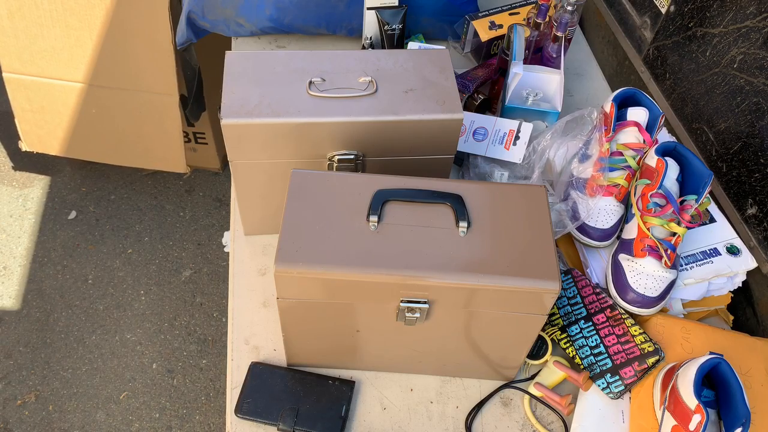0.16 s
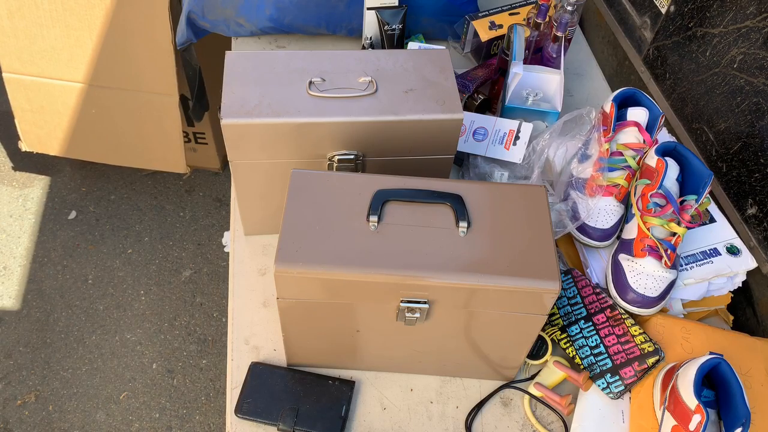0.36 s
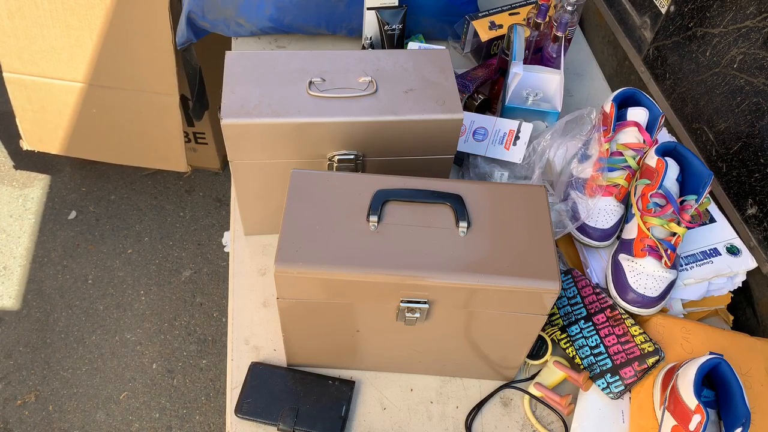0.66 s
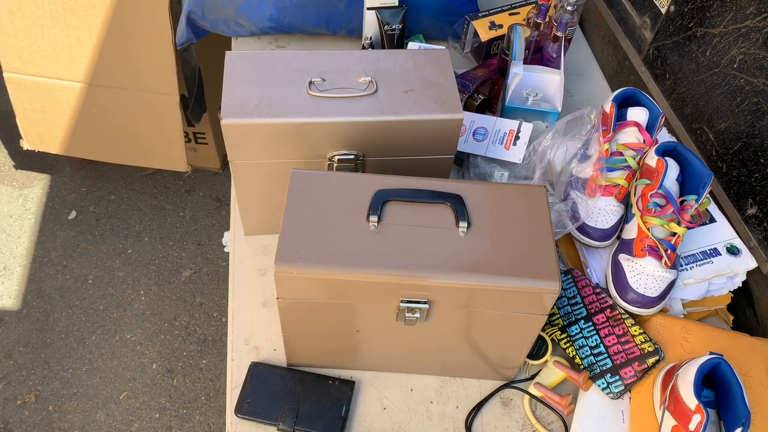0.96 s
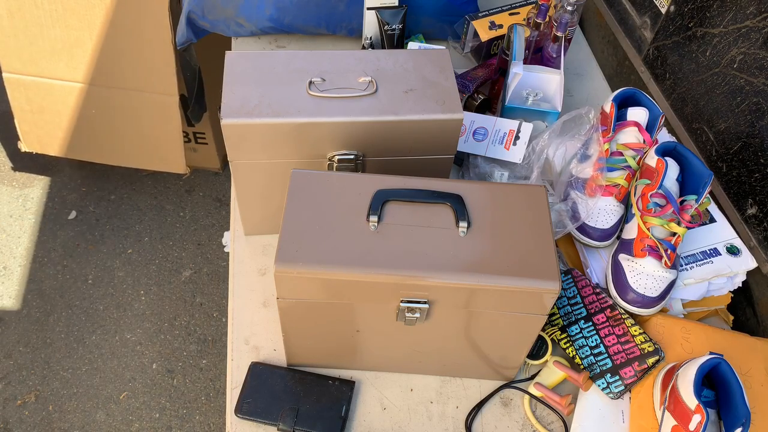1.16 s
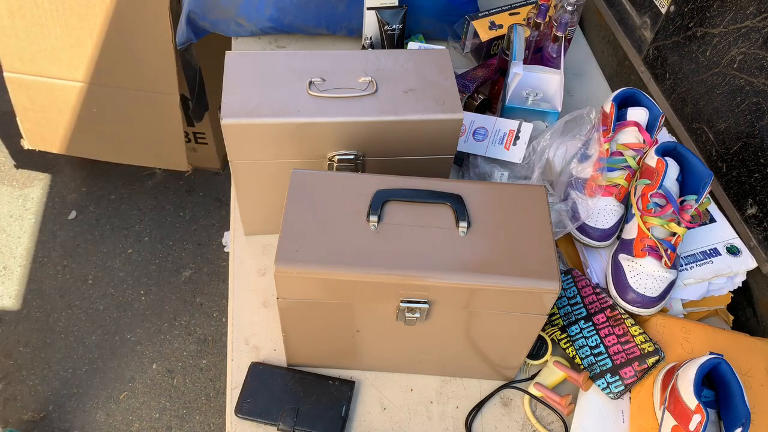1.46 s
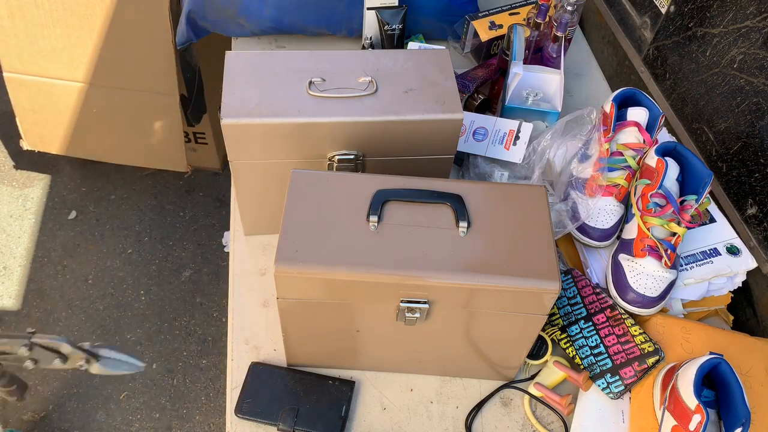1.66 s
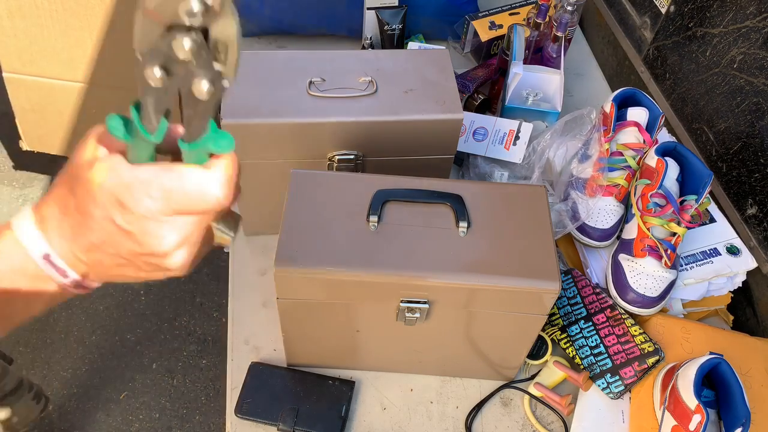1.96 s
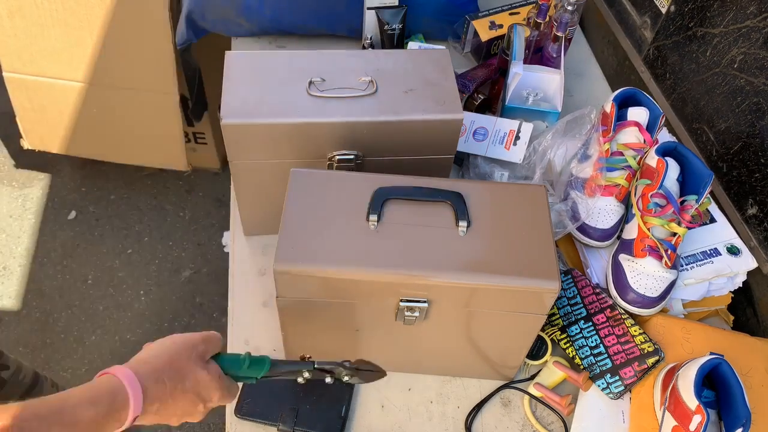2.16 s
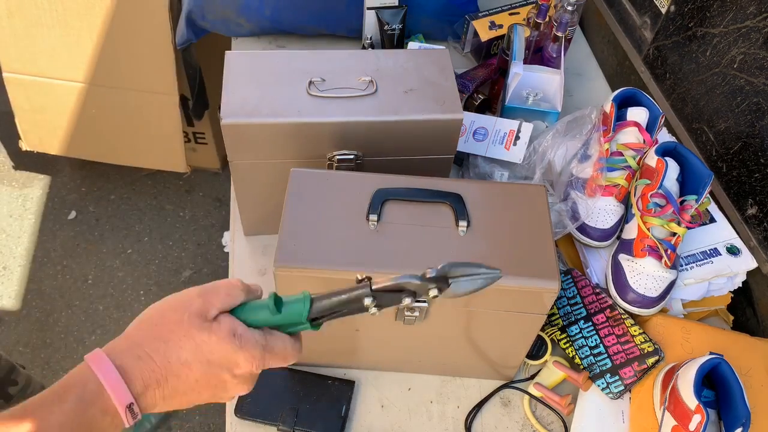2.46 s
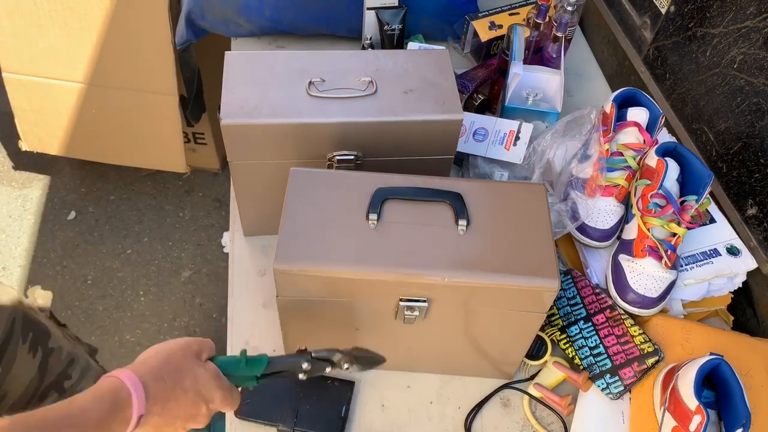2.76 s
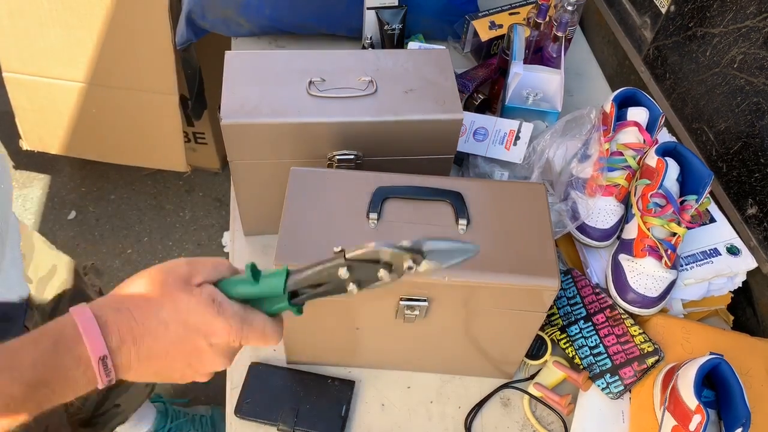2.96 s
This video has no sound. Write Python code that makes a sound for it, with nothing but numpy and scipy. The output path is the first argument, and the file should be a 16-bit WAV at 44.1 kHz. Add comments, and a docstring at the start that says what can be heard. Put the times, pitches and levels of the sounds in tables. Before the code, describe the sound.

Outdoors, quiet wind rumble and shoes scuffing on grit come first, then a loud, rattling metal clank on a thin steel box, a brief pause, and a second shorter clank. Close stereo microphone, faint yard echoes.

```python
"""File box struck twice in a yard

Outdoors in light wind, someone walks up over gritty paving: filtered grains scuff and damped sines knock.
A pair of snips strikes a sheet-steel file box twice, each blow chattering and rebounding.
Clicks ring the panels as decaying sines; noise gathered on dense modes makes the clatter and yard echoes.
Banded noise makes wind rumble on the microphone over distant outdoor noise; slow sines make the puffs.
"""
import sys
import numpy as np
from scipy import signal
from scipy.fft import rfft, irfft
from scipy.io import wavfile
from scipy.ndimage import uniform_filter1d

SR = 44100
rng = np.random.default_rng(int(sys.argv[2]) if len(sys.argv) > 2 else 0)


def to_wav(s):
    """Save 16-bit WAV."""
    ch = np.atleast_2d(s).T  # columns
    pcm = np.round(np.clip(ch, -1, 1) * 32767)  # PCM
    wavfile.write(sys.argv[1], SR, pcm.astype(np.int16))


N = 136710
T = np.arange(N) / SR
SIDES = np.array([[.5], [-.5]])  # shares a left-minus-right dB figure between the channels

# Wind on the microphone, strength over time: time_s, level_db
WIND_LEVEL = [(0.0, -57), (0.17, -44), (0.31, -37), (0.68, -47), (0.95, -44.5), (1.29, -39.5), (1.46, -39),
              (1.67, -46.5), (1.86, -47), (2.06, -49), (2.17, -43), (2.3, -55), (2.41, -53.5), (2.58, -44),
              (2.75, -52), (2.88, -50), (3.1, -62.5)]
# Colour of the wind rumble, relative: frequency_hz, level_db_per_hz
WIND_COLOUR = [(12, -33), (20, 0), (49, 6), (113, -8.5), (182, -19), (200, -40.5), (300, -27.5), (390, -36),
               (660, -120)]
WIND_LUMP_DB, WIND_PATCH_DB = 0.105, 0.8  # unevenness of all bands together, of each band alone

# Distant outdoor noise over time, before AIR_LIFT_DB: time_s, level_db
AIR_LEVEL = [(0.0, -59), (0.94, -56), (1.96, -58.5), (2.24, -49.5), (2.49, -60.5), (2.72, -61.5),
             (2.83, -52.5), (3.1, -61)]
# Colour of the distant noise, relative: frequency_hz, level_db_per_hz
AIR_COLOUR = [(100, 3.5), (150, -3.5), (224, -5.5), (283, -13.5), (471, -15), (700, -18), (1130, -19),
              (3190, -44), (5500, -54.5), (8500, -43.5), (13500, -50), (16000, -52.5)]
# Left-right likeness of wind, distant noise and scuffs: frequency_hz, correlation
AIR_LIKENESS = [(30, 0.94), (100, .96), (500, 0.6), (1500, 0.17), (5000, 0.1), (14000, .3)]
AIR_LIFT_DB, AIR_PATCH_DB = 8.5, 2.3

# Soles scuffing on grit: start_s, rise_s, hold_s, level_db, tilt_db_per_octave, edge_db (extra near EDGE_HZ)
SCUFFS = [(0.16, 0.011, 0.056, -52, 0, -7), (0.174, 0.023, 0.046, -45, 1.8, 1),
          (0.29, 0.0061, 0.025, -58.5, -1.5, -9), (0.343, 0.022, 0.046, -59, -2, 0.1),
          (0.7, 0.015, 0.09, -73.5, 2, 0.1), (0.811, 0.0018, .008, -59, 12, 15),
          (0.83, .002, 0.0067, -49, 0.6, -3), (0.864, 0.0036, 0.016, -64, -3, -8),
          (0.902, 0.0004, 0.0016, -59.5, -9.5, 7), (0.937, 0.0047, 0.066, -62, -6, -6),
          (1.104, .002, 0.0041, -69, -10.5, 7), (1.13, 0.043, 0.13, -76, -8.5, 13),
          (1.307, 0.0023, .004, -60, -5, -7), (1.323, 0.0059, 0.029, -47, -6.5, 3),
          (1.348, 0.0051, 0.011, -46.5, -5.5, 15), (1.358, 0.0016, 0.0098, -42.5, 0, 8),
          (1.378, .002, 0.029, -54, -8, -13), (1.424, 0.0027, 0.0056, -44, -1, 2.5),
          (1.442, .004, 0.026, -72, -8, -3), (1.493, .003, 0.047, -59.5, -5.6, -9),
          (1.812, 0.0022, .003, -78, -10.5, 13), (1.89, 0.0036, .004, -76, 16, 5),
          (1.945, .003, 0.012, -62, -8, -1), (1.984, 0.0014, 0.003, -59, -1, 6),
          (2.006, 0.00088, 0.0081, -46.5, -2.8, -2), (2.583, 0.0033, 0.007, -71, -6, 12)]
# Colour of the grit, relative: frequency_hz, level_db_per_hz
GRIT_COLOUR = [(300, -17.5), (700, -10.5), (1400, -7.5), (2800, -6.5), (4400, -3.5), (6200, -6), (8500, 0),
               (13700, -9.5), (16000, -8)]
SCUFF_T60_S, GRAINS_PER_S, GRAIN_SPREAD_DB = 0.04, 8300, 2
EDGE_HZ, EDGE_OCTAVES = 4000, 0.21
AFTER_DB, AFTER_T60_S = -5.5, 0.25  # loose grit and echoes after a scuff, relative to it
GRIT_PATCH_DB = 0.55  # uneven colour

# Low puffs of wind: start_s, level_db (before softening), pitch_hz
PUFFS = [(.247, -21.5, 50), (0.299, -28, 45), (0.851, -34, 110), (.943, -40, 70), (1.255, -23, 77),
         (1.42, -34, 60), (1.589, -25, 46)]
# Soles landing: start_s, level_db, pitch_hz
STEPS = [(0.361, -40, 324), (.85, -34, 304), (1.334, -34, 332), (1.347, -43, 490), (1.356, -27.5, 327),
         (1.362, -35, 890), (1.392, -28.5, 720), (1.402, -41, 450), (1.413, -35, 400), (1.934, -33, 408),
         (1.936, -39, 800), (1.959, -37.5, 346)]
PUFF_CYCLES, STEP_CYCLES = 7.5, 14.9  # cycles taken to fall 60 dB

# Contacts of tool and box: peak_s, rise_s, clatter_db,
# four columns of panel_ring_db from the highest range to the lowest, thump_db, pan_left_minus_right_db
CONTACTS = [(2.099, 0.02, -7, -21.5, -19.5, -19.5, -33, -40, -9.5),
            (2.105, .004, -22, -34, -26, -34.5, -41, -45, -6),
            (2.120, 0.0025, -38, -16, -16.5, -28, -20, -18, 8),
            (2.137, 0.0058, -14.5, -14, -14, -22, -21, -17, -1.5),
            (2.158, 0.0021, -16.5, -26, -43, -28.5, -18, -41, 3),
            (2.180, 0.0038, -20, -38, -25.5, -24.5, -38, -34, -0.5),
            (2.227, 0.0013, -17.5, -20.5, -16.5, -22, -22, -35, 1.5),
            (2.280, 0.0032, -42, -26.5, -30, -28.5, -19, -43, 2.5),
            (2.325, .004, -62, -50, -42.5, -46, -32.5, -53, 2),
            (2.375, .010, -55, -56, -57, -56, -51, -56, -1),
            (2.43, .010, -60, -59, -59, -55.5, -52, -62, 0),
            (2.639, 0.0013, -53, -57, -62.5, -71, -68, -60.5, 1.5),
            (2.695, 0.01184, -11, -22, -26, -28, -36.5, -33, 0),
            (2.714, 0.0044, -16, -19, -15, -19, -22.5, -9.5, 1.5),
            (2.730, 0.0026, -18, -27.5, -17.5, -17, -25, -14, 1),
            (2.765, 0.0039, -28.5, -23, -24.5, -30.5, -26, -44, 1.5),
            (2.815, 0.0039, -52, -42, -40, -48, -26, -47, 1),
            (2.875, 0.0043, -66, -57, -63, -46, -38, -36.5, 0),
            (2.93, 0.0042, -63, -59.5, -54.5, -59.5, -43.5, -35.5, 1)]
# Colour of the clatter, relative: frequency_hz, level_db_per_hz
CLATTER_COLOUR = [(100, -23.5), (343, -14), (600, -21), (900, -12.5), (1400, -19), (2500, -18.5),
                  (4500, -20), (8600, -19), (13500, -22), (15200, -30), (16000, -34)]
# Decay of the dense high modes: frequency_hz, t60_s
CLATTER_T60 = [(150, 0.65), (600, 0.35), (2000, 0.24), (6000, 0.16), (14000, 0.18)]
# Decay of the yard's echoes: frequency_hz, t60_s
ECHO_T60 = [(200, 0.57), (2000, 1), (4800, 0.63), (8000, 0.41), (14000, 0.12)]
# Left-right likeness of the clatter: frequency_hz, correlation
BLOW_LIKENESS = [(100, 0.88), (500, 0.52), (1500, 0.29), (4000, 0.025), (9000, 0.016), (14000, 0.96)]
# Stereo balance of the clatter: frequency_hz, left_minus_right_db
BLOW_BALANCE = [(60, 9), (110, -9.5), (200, 2.5), (380, -1), (700, -2.5), (1290, 6), (2380, 0.5),
                (4400, -2.5), (8120, -5), (15000, 0.5)]
CRACK_T60_S, RING_DB, ECHO_DB = .035, -2.5, -22.5  # first crack; ring and echoes relative to it
SHARP_ABOVE_HZ, SHARP_RISE = 8000, .3  # the top cracks in more suddenly: share of the rise
GRAIN_DB, RATTLE_DB = 1.2, 1.3  # unevenness of the clatter and of its echoes
MODE_GAP_HZ, MODE_WIDTH_HZ = 60, 43  # mean spacing and width of the dense high modes
BETWEEN_POWER, LOCKED_SHARE = 0.75, 0.46  # power between modes; share of the side locked to the middle

# Panel modes of the box: frequency_hz, level_db (added to panel_ring_db), t60_s
PANEL_MODES = [(82.4, -14.5, 0.42), (159.2, -7.5, 0.37), (186.6, -6, 0.73), (262.3, 4, 0.17),
               (345.2, -1, 0.34), (450, -6.5, 0.22), (599.5, -15, 0.23), (685, -12, 0.18),
               (754, -15.5, 0.1), (795, -1, 0.32), (853.7, -8, 0.59), (934, -14.5, 0.31), (972, -10, 0.19),
               (1145, -16.5, 0.42), (1256, -1.5, 0.16)]
# Borders of the four panel ranges: frequency_hz
PANEL_RANGES_HZ = [900, 550, 220]
# Stereo balance of the panels: frequency_hz, left_minus_right_db
PANEL_BALANCE = [(90, -1), (260, -1), (600, 3.5), (1250, 0.9)]
# The box rocks down onto its base and its panels are damped: start_s, damping_db_per_s
SETTLES = [(2.207, 505), (2.305, 244.5), (2.848, 207), (2.991, 131.5)]
THUMP_HZ, THUMP_T60_S, MODE_SCATTER_DB = 90.7, 0.18, 2.5

# Treble dips of the microphone housing: frequency_hz, width_hz, depth_db
MIC_DIPS = [(7200, 1100, 6), (11310, 2600, 39.5)]
CLIP, CUTOFF_HZ = .88, 16500  # full-scale ceiling of the rounding; stopband edge


def from_db(db):
    """Amplitude ratio of a level in dB."""
    return 10 ** (np.asarray(db) / 20)


def in_time(rows):
    """Straight lines between timed points."""
    return np.interp(T, *np.transpose(rows))


def at_hz(points, hz):
    """Read a table at hz, along log frequency."""
    table_hz, values = np.transpose(points)
    return np.interp(np.log(hz), np.log(table_hz), values, left=values[0])


def drift(rate_hz):
    """Slow random wandering of spread 1, made at every 40th sample."""
    r = np.exp(-80 * np.pi * rate_hz / SR)
    noise = rng.standard_normal(N // 40 + 2002)
    slow = signal.lfilter([1], [1, -2 * r, r * r], noise)[2000:]
    return np.interp(np.arange(N) / 40, np.arange(len(slow)), slow / slow.std())


def clicks(start_s, size):
    """Single-sample impulses."""
    out = np.zeros(N)
    out[(np.asarray(start_s) * SR).astype(int)] = size
    return out


def ring(impulses, hz, t60_s):
    """A resonator: a unit click sets a decaying sine of height 1 ringing."""
    r, w = from_db(-60 / (t60_s * SR)), 2 * np.pi * hz / SR
    return signal.lfilter([0, np.sin(w)], [1, -2 * r * np.cos(w), r * r], impulses + 1e-18)


def shape(start_s, rise_s, hold_s, t60_s):
    """Power envelope: steep rise, hold, exponential release."""
    rise_s = max(rise_s, 2e-4)
    rising = np.clip((T - start_s) / rise_s, 0, 1) ** 4
    return rising * from_db(-120 * np.clip((T - start_s - rise_s - hold_s) / t60_s, 0, 3))


def dying(power, t60_s):
    """Power left ringing after short impulses of power."""
    return signal.lfilter([1], [1, -from_db(-120 / (t60_s * SR))], power + 1e-18)


def stereo_noise():
    """Two sets of white middle and side noise, for alternate bands."""
    return rng.standard_normal((2, 2, N))


def bands(colour, likeness, white, per_octave=2):
    """Stereo bands within the colour's range, scaled to a joint rms of 1: list of (hz, band)."""
    edges = 16400 / 2 ** (np.arange(10 * per_octave) / per_octave)
    out = []
    for k, (high, low) in enumerate(zip(edges, edges[1:])):
        hz = np.sqrt(low * high)
        if colour[0][0] <= hz <= colour[-1][0]:
            band_filter = signal.butter(2, [low, high], "band", fs=SR, output="sos")
            mid, side = signal.sosfilt(band_filter, white[k % 2])
            alike = np.clip(at_hz(likeness, hz), -.99, .99)
            stereo = np.sqrt(1 + alike) * mid + np.sqrt(1 - alike) * side * [[1], [-1]]
            out.append((hz, from_db(at_hz(colour, hz)) * stereo))
    total = np.sqrt(sum(np.mean(band ** 2) for _, band in out))
    return [(hz, band / total) for hz, band in out]


def wind():
    """Lumpy low rumble on the microphone: noise bands that waver together and apart."""
    lump_db = WIND_LUMP_DB * drift(22)
    rumble = 0
    for _, band in bands(WIND_COLOUR, AIR_LIKENESS, stereo_noise()):
        rumble = rumble + from_db(lump_db + WIND_PATCH_DB * drift(40)) * band
    return from_db(in_time(WIND_LEVEL)) * rumble


def distant_air():
    """Patchy distant wash: noise bands that each waver alone."""
    wash = 0
    for _, band in bands(AIR_COLOUR, AIR_LIKENESS, stereo_noise()):
        wash = wash + from_db(AIR_PATCH_DB * drift(15)) * band
    return from_db(in_time(AIR_LEVEL) + AIR_LIFT_DB) * wash


def scuffs():
    """Dense random grains of grit under the soles, coloured anew by each scuff."""
    size = from_db(GRAIN_SPREAD_DB * np.minimum(rng.exponential(1, (2, 1, N)), 5))
    present = rng.random((2, 1, N)) < GRAINS_PER_S / SR
    grains = size * present * stereo_noise()
    shapes = []
    for start_s, rise_s, hold_s, *_ in SCUFFS:
        after = from_db(2 * AFTER_DB) * shape(start_s, rise_s, hold_s, AFTER_T60_S)
        shapes.append(shape(start_s, rise_s, hold_s, SCUFF_T60_S) + after)
    shapes = np.array(shapes)
    level_db, tilt, edge_db = np.transpose(SCUFFS)[3:]
    out = 0
    for hz, band in bands(GRIT_COLOUR, AIR_LIKENESS, grains, per_octave=3):
        edge = np.exp(-(np.log2(hz / EDGE_HZ) / EDGE_OCTAVES) ** 2)
        colour_db = tilt * np.log2(hz / 6000) + edge_db * edge
        power = from_db(2 * (level_db + colour_db)) @ shapes
        out = out + np.sqrt(power) * band * from_db(GRIT_PATCH_DB * drift(25))
    return out


def puffs():
    """Single gusts push the microphone and swing out in a few cycles, softened by a low-pass."""
    swings = sum(ring(clicks([s], from_db(db)), hz, PUFF_CYCLES / hz) for s, db, hz in PUFFS)
    return signal.lfilter([.02], [1, -.98], swings)


def footfalls():
    """Short hollow knocks as soles land: sines that die within a few cycles."""
    return sum(ring(clicks([s], from_db(db)), hz, STEP_CYCLES / hz) for s, db, hz in STEPS)


def dense_modes():
    """Noise gathered on closely spaced narrow modes; the side is partly the middle a quarter cycle on."""
    noise, bin_hz = rfft(stereo_noise()), SR / N
    count = noise.shape[2]
    marks = (rng.random(count) < bin_hz / MODE_GAP_HZ) * rng.exponential(1, count)
    off_hz = np.arange(-600, 601) * bin_hz
    resonance = 1 / (1 + (2 * off_hz / MODE_WIDTH_HZ) ** 2)
    power = signal.fftconvolve(marks, resonance, "same").clip(1e-4)
    weight = np.sqrt(BETWEEN_POWER + power / uniform_filter1d(power, size=700))
    locked = np.sqrt(LOCKED_SHARE) * 1j * noise[:, 0]
    noise[:, 1] = locked + np.sqrt(1 - LOCKED_SHARE) * noise[:, 1]
    return irfft(weight * noise, N)


def crack(rise_share):
    """Power of the first crack of every contact, reaching its peak at the contact's time."""
    power = 0
    for peak_s, rise_s, db, *_ in CONTACTS:
        rise_s = rise_share * rise_s
        power = power + from_db(2 * db) * shape(peak_s - rise_s, rise_s, 0, CRACK_T60_S)
    return power


def clatter():
    """Each contact cracks and feeds the dense high modes; an uneven rattle and the yard's echoes follow."""
    peak_s, _, level_db = np.transpose(CONTACTS)[:3]
    pan_db = np.interp(T, peak_s, np.transpose(CONTACTS)[-1])
    soft, sharp = crack(1), crack(SHARP_RISE)
    fed = clicks(peak_s, from_db(2 * level_db))
    rattle = drift(30)
    out = 0
    for hz, band in bands(CLATTER_COLOUR, BLOW_LIKENESS, dense_modes()):
        echo_db = ECHO_DB + RATTLE_DB * (rattle + drift(10))
        echoes = from_db(2 * echo_db) * dying(fed, at_hz(ECHO_T60, hz))
        ringing = from_db(2 * RING_DB) * dying(fed, at_hz(CLATTER_T60, hz))
        power = (sharp if hz > SHARP_ABOVE_HZ else soft) + ringing + echoes
        uneven = from_db(GRAIN_DB * drift(45))
        out = out + np.sqrt(power) * uneven * band * from_db(at_hz(BLOW_BALANCE, hz) * SIDES)
    return from_db(pan_db * SIDES) * out


def box():
    """Contacts strike the panel modes and a thump; the panel ring is cut short when the box settles."""
    rows = np.array(CONTACTS)
    strike_s = rows[:, 0] - rows[:, 1] / 2  # halfway up the rise
    scatter_db = MODE_SCATTER_DB * rng.standard_normal((len(rows), len(PANEL_MODES)))
    out = ring(clicks(strike_s, from_db(rows[:, 7])), THUMP_HZ, THUMP_T60_S)
    group = np.searchsorted([stop_s for stop_s, _ in SETTLES], strike_s)  # next settling after each contact
    for g, (stop_s, damping) in enumerate(SETTLES):
        mine, panels = group == g, 0
        for k, (hz, mode_db, t60_s) in enumerate(PANEL_MODES):
            column = 3 + sum(hz < edge for edge in PANEL_RANGES_HZ)
            level_db = rows[mine, column] + mode_db + scatter_db[mine, k]
            hits = clicks(strike_s[mine], (-1) ** k * from_db(level_db))  # alternate modes start inverted
            panels = panels + ring(hits, hz, t60_s) * from_db(at_hz(PANEL_BALANCE, hz) * SIDES)
        out = out + panels * from_db(-np.clip(damping * (T - stop_s), 0, 200))
    return out


def scene():
    """Sum wind and distance, the walk up, and the blows on the box."""
    return wind() + distant_air() + scuffs() + puffs() + footfalls() + clatter() + box()


def record(dry):
    """The microphone housing dips two treble bands, peaks are rounded, the top is cut."""
    for hz, width_hz, depth_db in MIC_DIPS:
        peak = signal.lfilter(*signal.iirpeak(hz, hz / width_hz, fs=SR), dry)
        dry = dry - (1 - from_db(-depth_db)) * peak
    rounded = CLIP * np.tanh(dry / CLIP)
    return signal.sosfilt(signal.cheby2(14, 90, CUTOFF_HZ, fs=SR, output="sos"), rounded)


dry = scene()
out = record(dry)
to_wav(out)
```